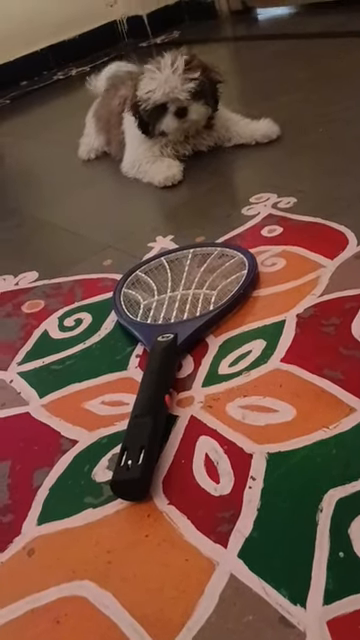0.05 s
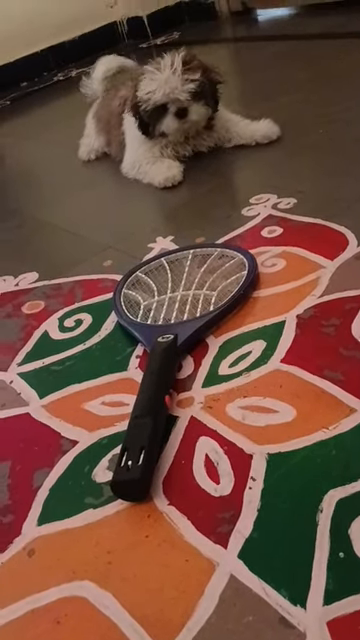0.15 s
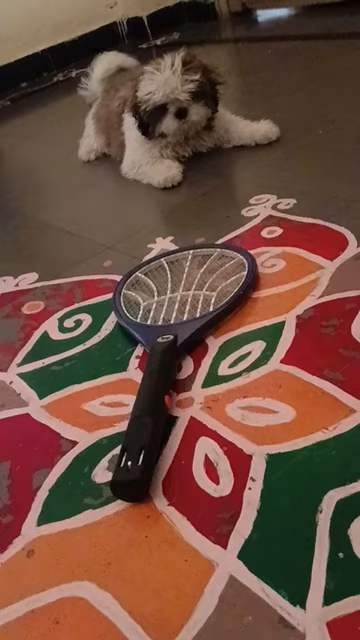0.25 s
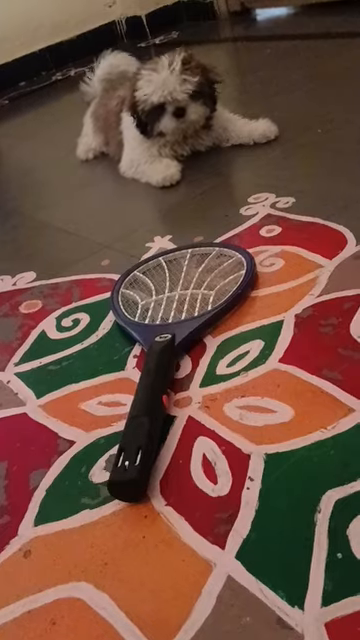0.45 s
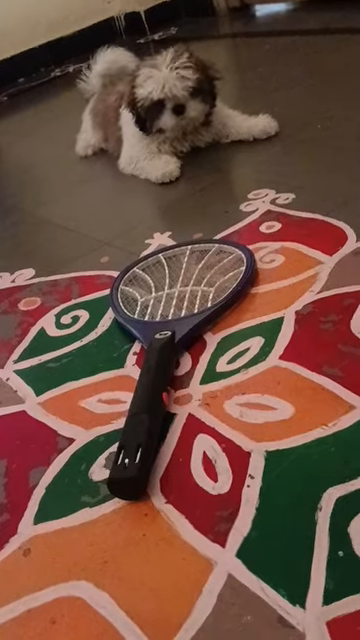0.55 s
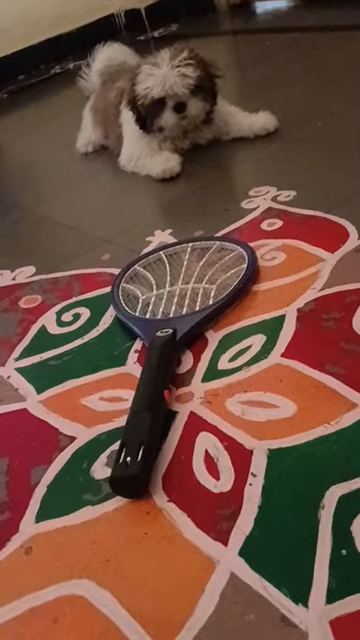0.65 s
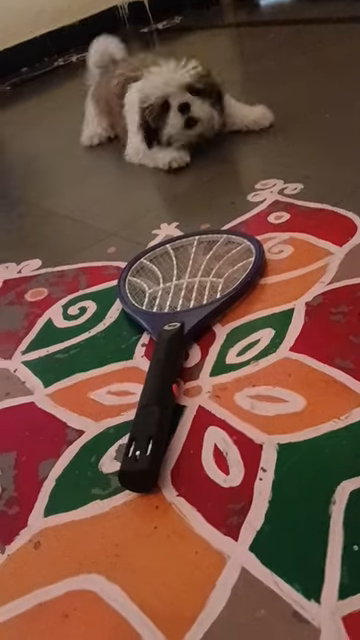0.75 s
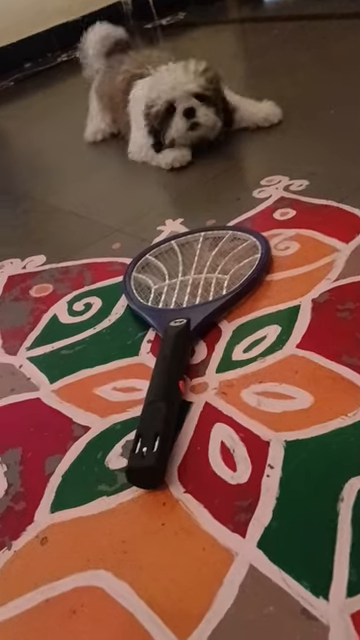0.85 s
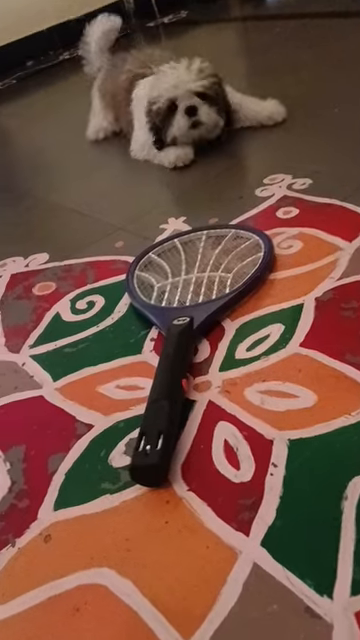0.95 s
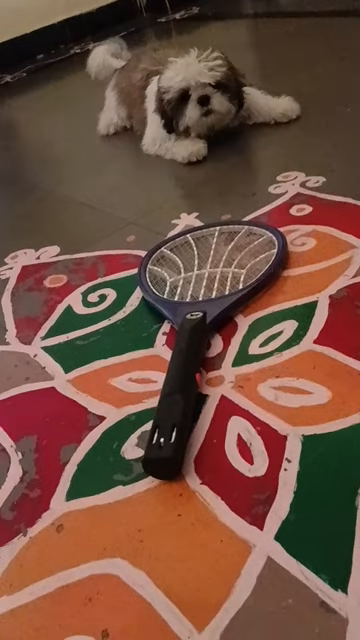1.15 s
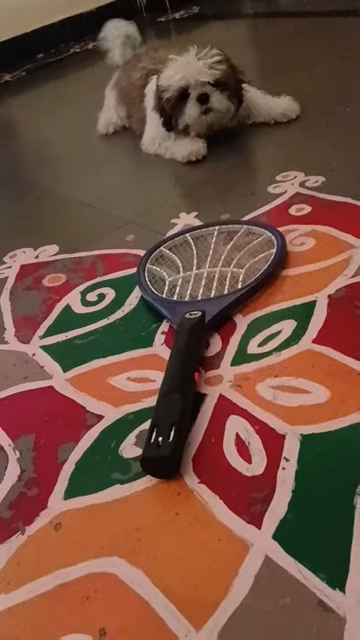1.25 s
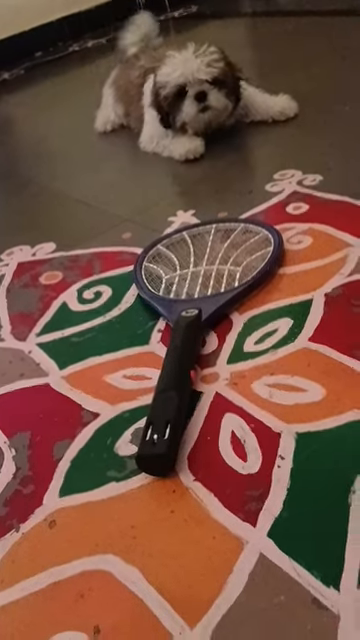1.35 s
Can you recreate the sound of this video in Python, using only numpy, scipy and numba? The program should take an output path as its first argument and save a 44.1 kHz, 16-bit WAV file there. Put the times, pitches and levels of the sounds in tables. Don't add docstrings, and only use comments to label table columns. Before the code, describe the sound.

Single sharp bark from a little dog indoors, walls ringing, then faint paw pats and claw ticks.

```python
import sys
import numpy as np
from scipy import signal
from scipy.fft import rfft, irfft
from scipy.io import wavfile
from scipy.ndimage import uniform_filter1d, minimum_filter1d
from numba import njit

SR = 44100
rng = np.random.default_rng(int(sys.argv[2]) if len(sys.argv) > 2 else 0)


def gain_from_db(level_db):
    decades = np.asarray(level_db, float) / 20
    return 10 ** decades


def dump(signal):
    limited = np.clip(np.atleast_2d(signal).T, -1, 1)
    pcm = np.round(limited * 32767).astype(np.int16)
    wavfile.write(sys.argv[1], SR, pcm)


N = 61739


def curve(table, hz):
    points = np.array(table, float)
    return np.interp(np.log(np.maximum(hz, 1)), np.log(points[:, 0]), points[:, 1])


def unit(x):
    return x / np.sqrt(np.mean(x ** 2))


def bell(hz, centre_hz, width_hz):
    return 1 / (1 + (2 * (hz - centre_hz) / width_hz) ** 2)


def shaped(x, gain):
    return irfft(rfft(x) * gain(np.arange(N // 2 + 1) * SR / N), N)


def shaped_noise(gain):
    return shaped(rng.standard_normal(N), gain)


def walk(rate_hz):
    k = int(SR / rate_hz)
    return unit(uniform_filter1d(uniform_filter1d(rng.standard_normal(N), k), k))


def half_octaves(count):
    for hz in 30 * 2 ** (np.arange(count) / 2):
        yield hz, shaped_noise(lambda f: np.cos(np.pi * np.clip(np.log2((f + 1) / hz), -.5, .5)))


# frequency in Hz, level in dB per Hz.
FAN_AIR = [(18, -41.5), (30, -26.5), (92, -8.5), (341, -2.5), (561, -17.5), (1200, -11.5), (5450, -37),
           (9190, -41.5), (15500, -56)]
# centre in Hz, width in Hz, boost in dB.
FAN_RESONANCES = [(100, 14, 11.5), (346.7, 20, 3.5), (699, 188, 10.5), (1114, 280, 4.5), (1734, 180, 4.5),
                  (2623, 1140, 8.5), (9300, 1600, 9.5), (1996, 410, 2), (6200, 2100, -4)]


def fan():
    level_db, flicker_db, flicker_hz = -32, 2.5, 28.4
    air = sum(noise * gain_from_db(flicker_db * walk(flicker_hz)) for _, noise in half_octaves(19))

    def colour(f):
        peaks_db = sum(db * bell(f, hz, width) for hz, width, db in FAN_RESONANCES)
        return gain_from_db(curve(FAN_AIR, f) + peaks_db)

    return gain_from_db(level_db) * unit(shaped(air, colour))


# centre in seconds, level in dB, pitch in Hz, length in seconds.
PAW_THUDS = [
    (.03, -31.5, 213, 0.015),
    (.63, -30.5, 186, 0.017),
    (.78, -30.5, 237, 0.017),
    (.815, -29.5, 240.6, 0.023),
    (1.2, -33.5, 146, 0.032),
    (1.257, -25.5, 82, 0.0079),
    (1.385, -38.5, 269, 0.018),
]


def paw_thuds(t):
    out = np.zeros(N)
    for centre, db, hz, length in PAW_THUDS:
        swell = np.exp(-((t - centre) / length) ** 2)
        out += gain_from_db(db) * swell * np.sin(2 * np.pi * hz * (t - centre))
    return out


# start in seconds, level in dB, centre in Hz, decay in seconds.
CLAW_TICKS = [
    (.192, -43, 9600, .014),
    (.7255, -45, 8500, .001),
    (.741, -44, 12500, .001),
    (1.06, -54, 9500, .001),
]


def claw_ticks(t):
    out = np.zeros(N)
    for start, db, hz, decay in CLAW_TICKS:
        burst = np.exp(-np.maximum(t - start, 0) / decay) * (t >= start)
        out += gain_from_db(db) * burst * unit(shaped_noise(lambda f: bell(f, hz, 5000) ** 2))
    return out


# frequency in Hz, level in dB.
VOICE_COLOUR = [(300, -16), (750, 2), (1500, -4.5), (2300, -17), (3000, -26.5), (4000, -41), (6500, -56.5),
                (9500, -52.5)]
# centre in Hz, width in Hz, boost in dB.
THROAT_RESONANCES = [(1820, 343, 8), (2300, 190, 2), (2738, 130, -14.5), (2826, 416, 15), (4120, 380, -4.5),
                     (5290, 1450, 15), (6700, 1000, -23), (8700, 600, 21)]
MOUTH_WIDTH_HZ, MOUTH_DB = 450, 12


def voice_colour_db(hz, mouth_hz, widen):
    throat = sum(db * bell(hz, centre, width) for centre, width, db in THROAT_RESONANCES)
    mouth = MOUTH_DB * bell(hz, mouth_hz, MOUTH_WIDTH_HZ * widen)
    top_fall = 1.5 * np.maximum(hz - 10000, 0) / 1000
    return curve(VOICE_COLOUR, hz) + throat + mouth - top_fall


# time in seconds, pitch in Hz, effort in dB, mouth resonance in Hz,
# chest tone (extra level of the fundamental) in dB.
BARK_PATH = [
    (.198, 320, -25.5, 1180, 20.5),
    (.207, 400.7, -9.5, 1500, 12),
    (.217, 496.5, -9, 1660, 7.5),
    (0.223, 556.1, 2, 1120, -24),
    (.241, 558.8, 3.5, 1120, -21),
    (.252, 760.7, 3.5, 1620, 0.5),
    (0.295, 759.7, 6.5, 1502, 6),
    (.314, 628.7, 1.5, 1270, -24.5),
    (0.331, 384.5, -9, 810, -3.5),
]


def bark(t):
    level_db, onset_s, release_s = 4.5, .006, 0.018
    jitter, soft_jitter, shimmer_db = .008, .02, 3.5
    rasp_db, breath_db = -12.5, -37
    path = np.array(BARK_PATH, float)
    pitch, effort_db, mouth_hz, chest_db = (
        uniform_filter1d(np.interp(t, path[:, 0], path[:, k]), size=130) for k in range(1, 5))
    attack = np.clip((t - path[0, 0]) / onset_s, 0, 1)
    release = np.exp(-np.maximum(t - path[-1, 0], 0) / release_s)
    gate = gain_from_db(effort_db) * attack * release

    roughness = soft_jitter * np.clip(-effort_db / 12, .15, 1)
    pitch = pitch * (1 + jitter * walk(70) + roughness * walk(400))
    phase = 2 * np.pi * np.cumsum(pitch) / SR

    def effort_tilt_db(f):
        return 1.6 * effort_db * np.clip(f - 2300, 0, 800) / 1000

    widen = 1 + 0.14 * np.maximum(-effort_db, 0)
    tone = np.zeros(N)
    for k in range(1, 13):
        db = voice_colour_db(k * pitch, mouth_hz, widen) - MOUTH_DB + effort_tilt_db(k * pitch)
        tone += gain_from_db(db + chest_db * (k == 1)) * np.sin(k * phase + .6 * k * k)

    puff = (1 + np.cos(phase)) * rng.standard_normal(N)
    rasp = unit(shaped(puff, lambda f: gain_from_db(voice_colour_db(f, 1100.0, 1))))
    low_rasp = shaped(rasp, lambda f: 1 / (1 + (f / 2400) ** 8))
    rasp = low_rasp + (rasp - low_rasp) * gain_from_db(effort_tilt_db(3700))
    hiss = unit(shaped(puff, lambda f: bell(f, 9530, 4040) ** 2 + gain_from_db(-25) * bell(f, 13000, 5000)))
    mid_hiss = unit(shaped(puff, lambda f: bell(f, 5320, 1400) ** 2))
    air = hiss + gain_from_db(-14 + effort_tilt_db(2500)) * mid_hiss
    voice = tone * gain_from_db(shimmer_db * walk(270)) + gain_from_db(rasp_db) * rasp + gain_from_db(breath_db) * air
    return gain_from_db(level_db) * gate * voice


# delay in seconds, level in dB.
FLOOR_AND_WALL_ECHOES = [(.0045, -14.5), (0.013, -10.5), (0.032, -9.5), (.047, -25.5), (.072, -17), (.105, -22.5),
                         (.19, -30.5), (.21, -29.5), (.235, -25)]
# frequency in Hz, time to fall 60 dB in seconds.
ROOM_RING = [(250, 1), (800, 0.45), (1500, 0.58), (3000, 0.54), (6000, .4), (10000, 0.38), (14000, 0.81)]
# frequency in Hz, level in dB, time to fall 60 dB in seconds.
STANDING_WAVES = [(779, -55.5, 0.4), (820, -63.5, 0.51), (996, -64, .3), (1272, -52, 0.54),
                  (1300, -58, 0.47), (1352, -61, 0.31), (1485, -51, 0.5), (1502, -60.5, 0.54),
                  (2810, -52, .3), (3022, -46.5, 0.23), (4560, -53, 0.44), (5450, -69.5, 0.33),
                  (8480, -55.5, 0.27), (10200, -50, .3)]


def room(x, t):
    tail_db, tail_start_s, echo_dull_s_khz = -7, .012, 0.48
    build = np.clip(t / tail_start_s - 1, 0, 1)
    tail = build * sum(noise * gain_from_db(-60 * t / curve(ROOM_RING, hz)) for hz, noise in half_octaves(19))
    response = gain_from_db(tail_db) * tail / np.sqrt(np.sum(tail ** 2))
    for hz, db, t60 in STANDING_WAVES:
        response += build * gain_from_db(db - 60 * t / t60) * np.sin(2 * np.pi * hz * t)

    def direct_and_echoes(f):
        total = 1
        for delay, db in FLOOR_AND_WALL_ECHOES:
            dulling = 1 + (f * delay / 1000 / echo_dull_s_khz) ** 2
            total = total + gain_from_db(db) * np.exp(-2j * np.pi * f * delay) / dulling
        return total

    return shaped(x, direct_and_echoes) + signal.fftconvolve(x, response)[:N]


def claw_scrape(t):
    start_s, length_s, level_db = .744, .06, -54
    progress = (t - start_s) / length_s
    drag = np.clip(progress * 12, 0, 1) * np.clip(1.3 - progress, 0, 1) * gain_from_db(1.6 * walk(150))
    return gain_from_db(level_db) * drag * unit(shaped_noise(lambda f: bell(f, 12400, 6030)))


def scene():
    t = np.arange(N) / SR
    mix = room(bark(t), t) + fan()
    mix += paw_thuds(t) + claw_ticks(t) + claw_scrape(t)
    return mix[None]


@njit
def follow(x, up, down):
    y, e = np.empty(len(x)), x[:2000].mean()
    for i in range(len(x)):
        e += (x[i] - e) * (up if x[i] > e else down)
        y[i] = e
    return y


def low_pass(x):
    return signal.sosfilt(signal.butter(12, 15660, fs=SR, output="sos"), x)


def record(dry):
    ahead_s, attack_s, recover_s = .006, .008, 0.059
    knee_db, ratio, bass_hz, bass_squeeze, ceiling = -30, 1.712, 410, 0.57, .88
    sound = dry[0]
    early = np.roll(np.abs(sound), -int(ahead_s * SR))
    envelope = follow(early, 1 / (attack_s * SR), 1 / (recover_s * SR))
    gain = np.minimum(gain_from_db(knee_db) / envelope, 1) ** (1 - 1 / ratio)
    bass = shaped(sound, lambda f: 1 / (1 + (f / bass_hz) ** 4))
    squeezed = gain * (sound - bass + bass * gain ** bass_squeeze)
    limit = minimum_filter1d(np.minimum(ceiling / (np.abs(squeezed) + 1e-9), 1), size=161)
    limit = uniform_filter1d(uniform_filter1d(limit, size=80), size=80)
    return low_pass((squeezed * limit)[None])


dry = scene()
out = record(dry)
dump(out)
```